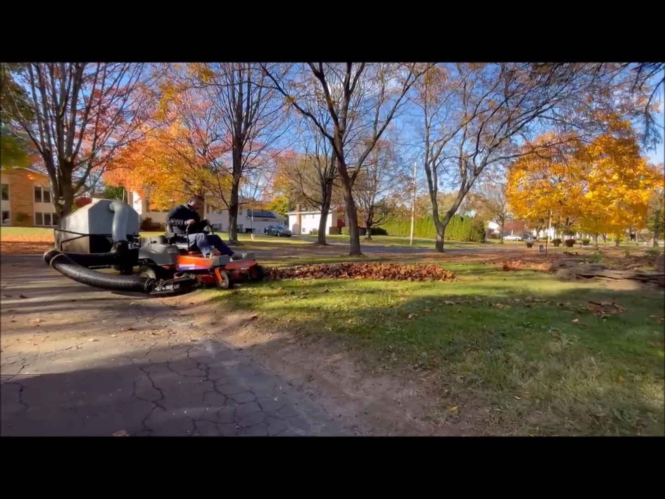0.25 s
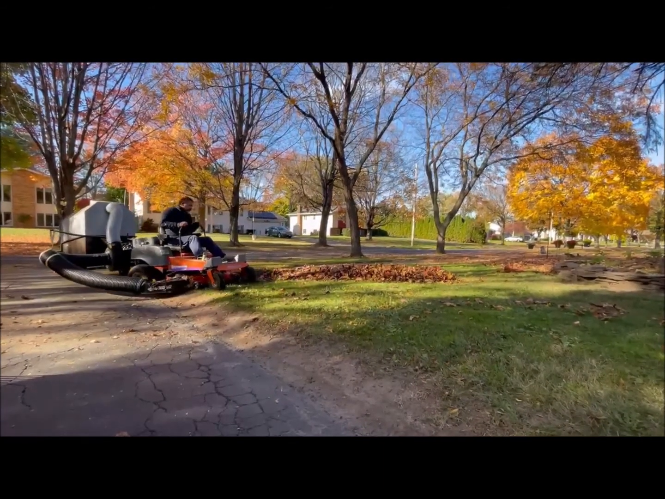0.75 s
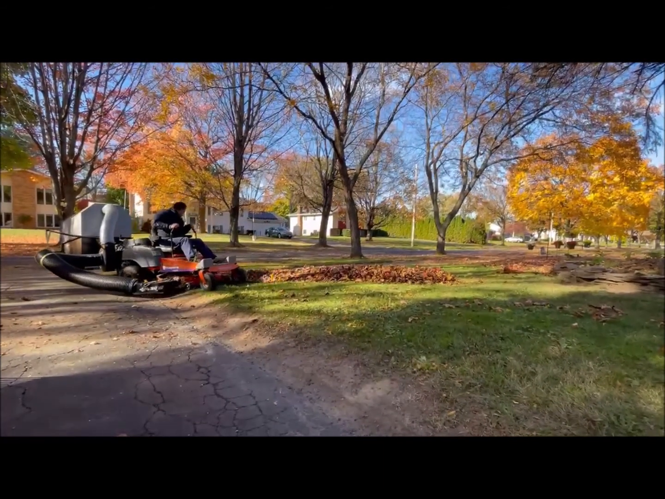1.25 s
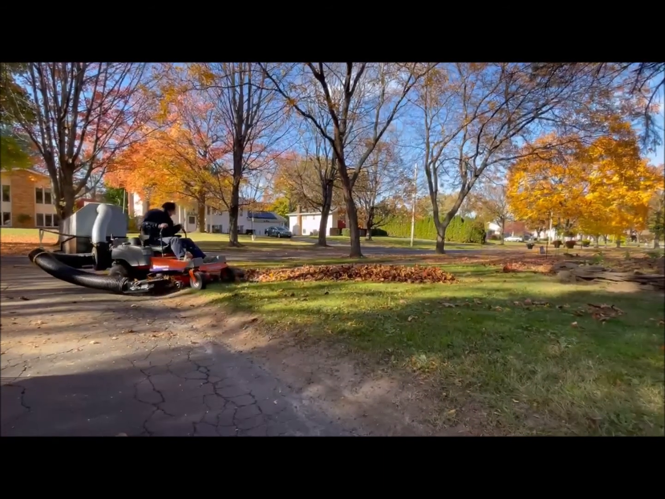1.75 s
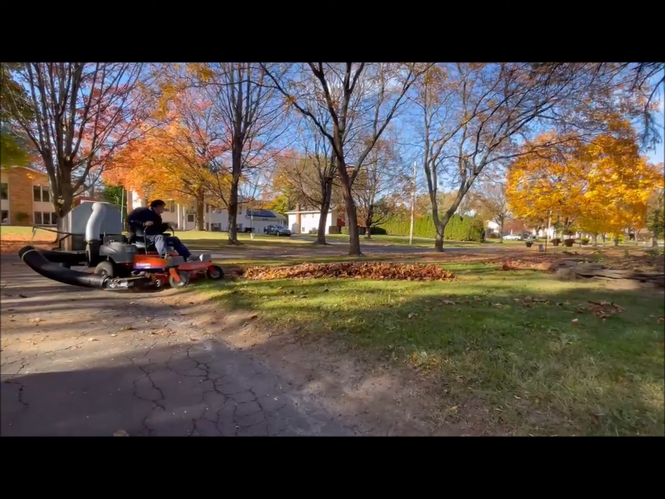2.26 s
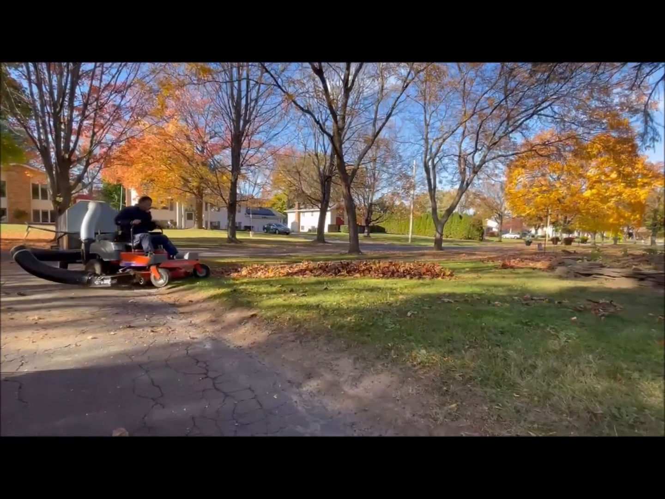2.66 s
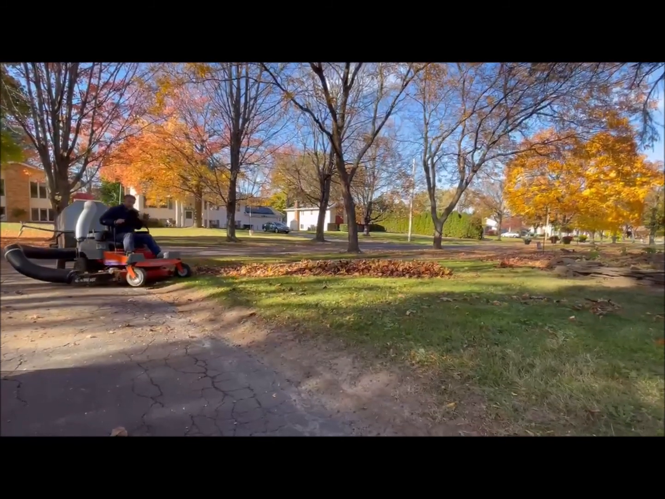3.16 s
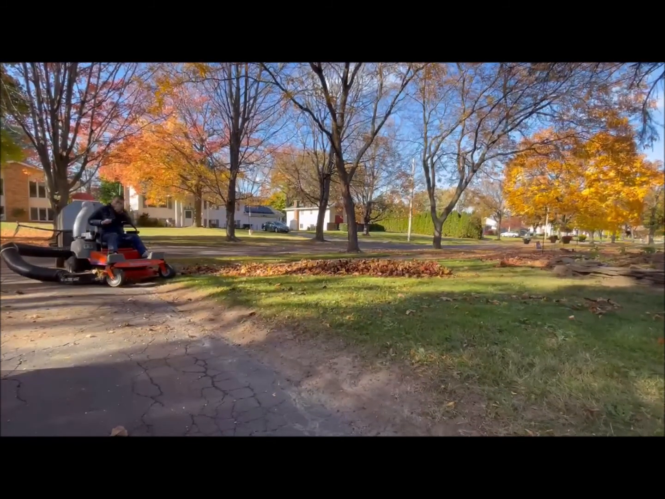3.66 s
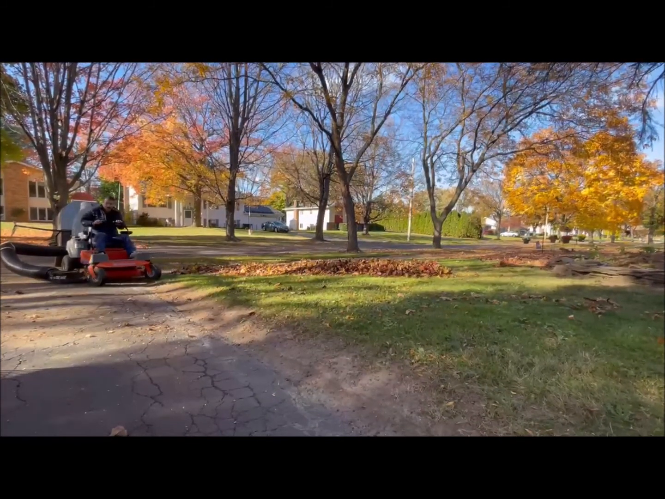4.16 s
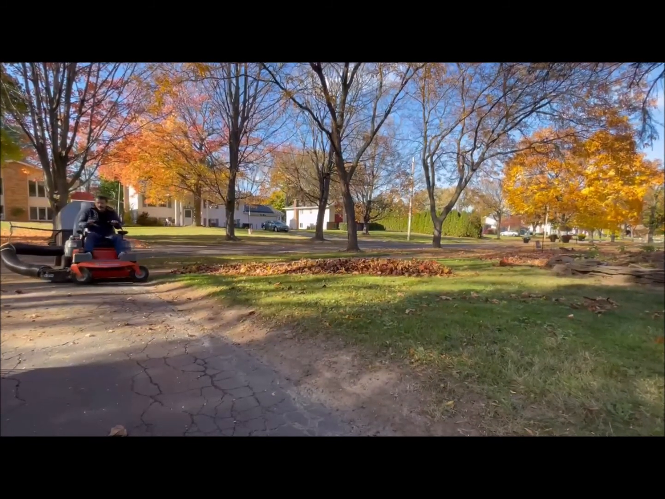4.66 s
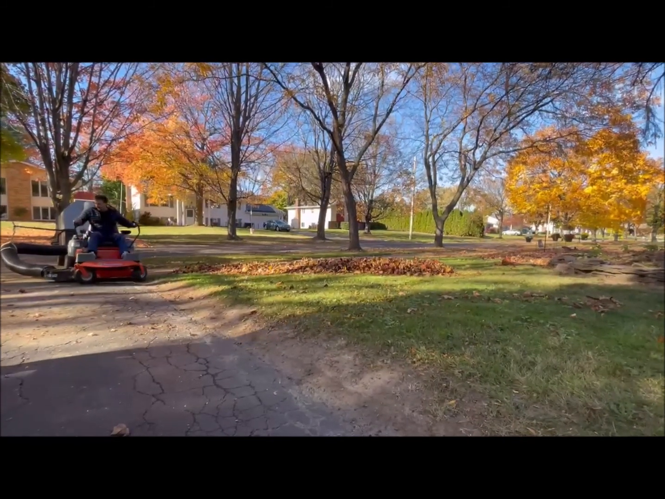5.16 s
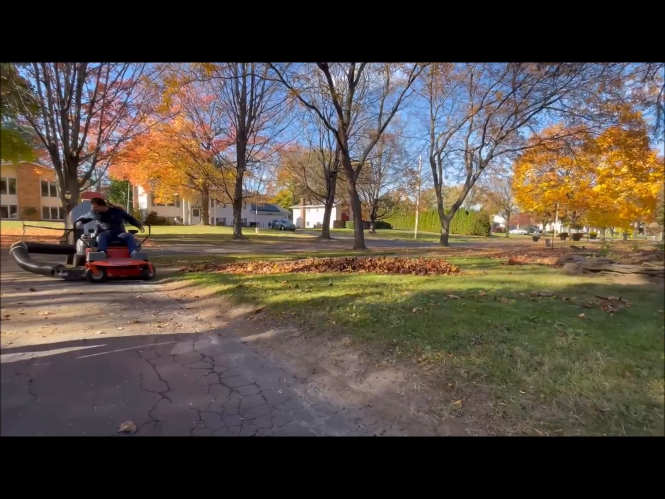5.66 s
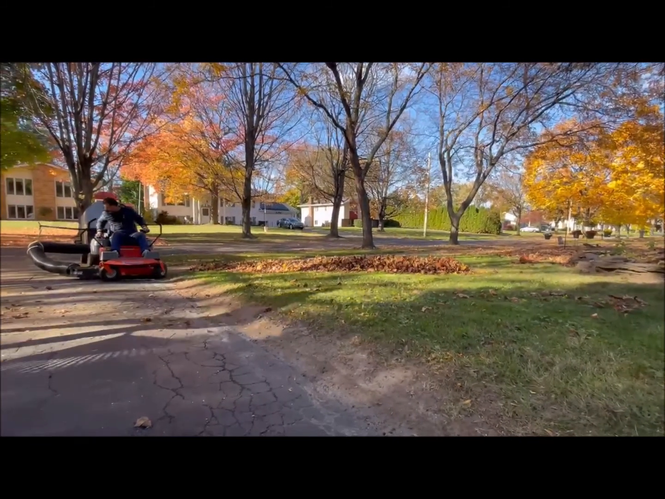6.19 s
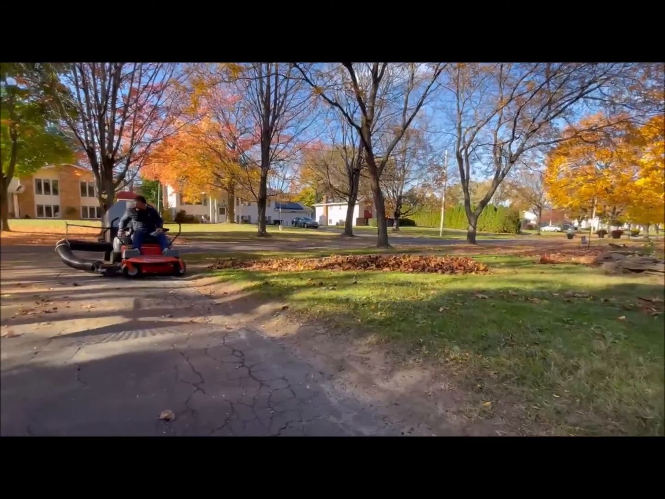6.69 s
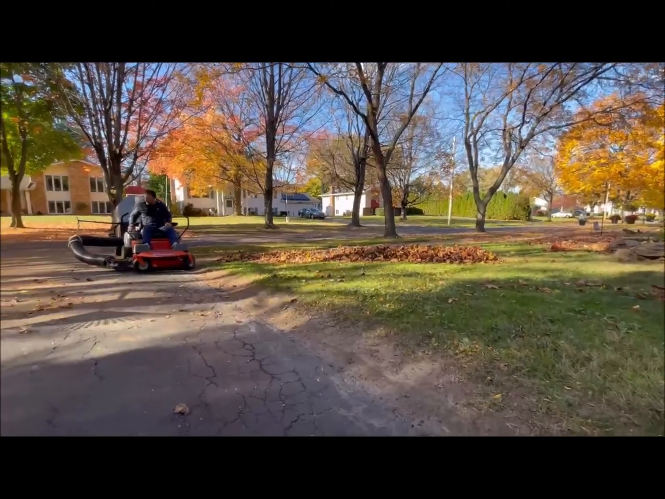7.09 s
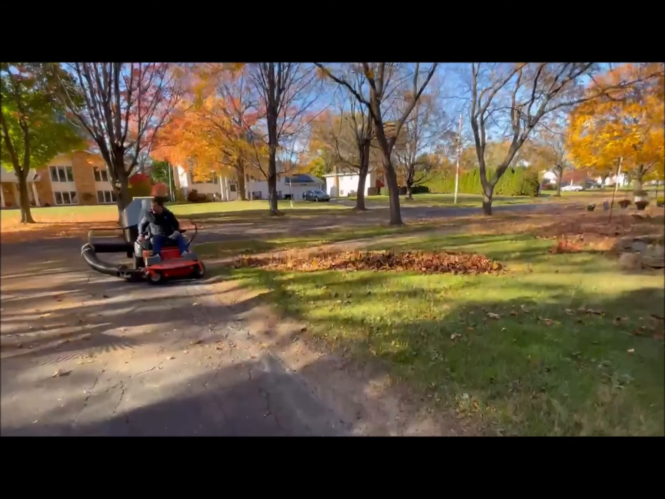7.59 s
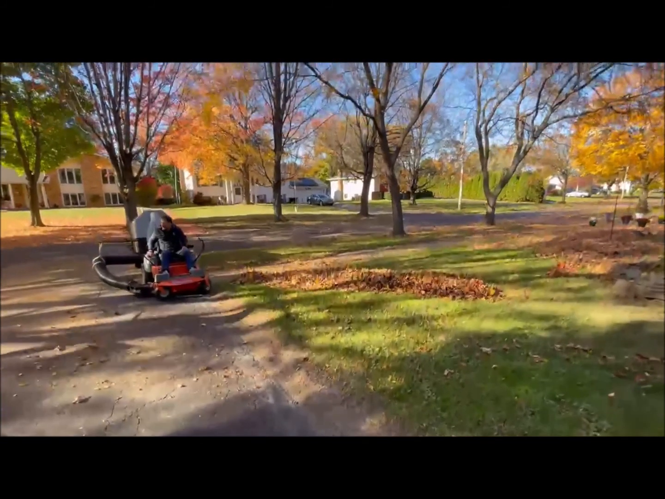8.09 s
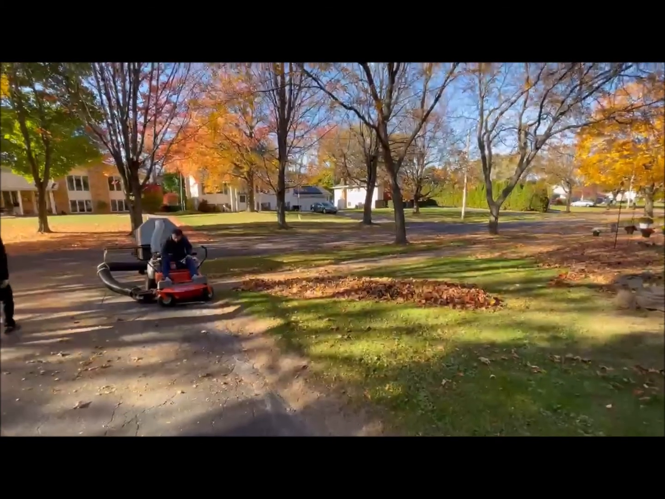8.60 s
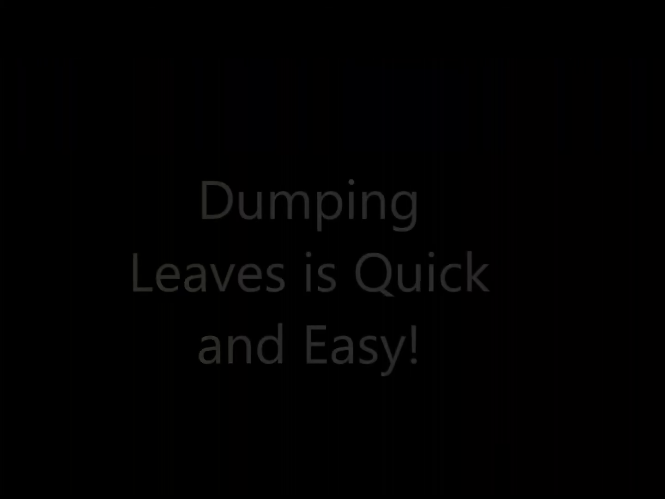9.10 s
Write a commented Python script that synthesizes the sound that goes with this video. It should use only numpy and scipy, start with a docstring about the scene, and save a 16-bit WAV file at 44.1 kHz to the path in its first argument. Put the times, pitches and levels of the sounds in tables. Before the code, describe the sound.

A riding mower tows a leaf vacuum across a lawn, a few metres ahead and to the left. Two engines drone under the hum and roar of the blades, while the fan howls and dry leaves and twigs rattle up the hose. Later the blades spin down with a rising swish, the mower throttles back, and leaves crunch close to the microphone. The sound cuts off suddenly.

```python
"""A riding mower tows a leaf vacuum with its own engine across a lawn, a few metres from a two-port
microphone. The two four-stroke engines beat against the hum and roar of the blades, while the vacuum's
fan howls and dry leaves and twigs rattle up the hose. The blades are switched off and spin down, the
mower throttles back and turns head-on, leaves crunch close by; then the sound is cut."""
import sys
import numpy as np
from scipy import signal
from scipy.fft import rfft, irfft
from scipy.io import wavfile

SR = 44100
rng = np.random.default_rng(int(sys.argv[2]) if len(sys.argv) > 2 else 0)


def dump_mix(stems):
    """Bounce the given channels to the path in sys.argv[1] as a 16-bit WAV at rate SR."""
    frames = np.atleast_2d(stems).T  # one column per channel
    limited = np.clip(frames, -1, 1)  # hard clip at full scale
    pcm = np.round(limited * 32767).astype(np.int16)
    wavfile.write(sys.argv[1], SR, pcm)


N = 411894
TIME, BINS_HZ = np.arange(N) / SR, np.fft.rfftfreq(N, 1 / SR)

# mower crankshaft: (time [s], speed [rev/s], exhaust level [dB], unevenness [share of speed])
MOWER_CRANK = [(0, 52.6, 0, .0015), (1.5, 52.6, 0, .0015), (2.25, 52.3, 0, .0015), (3, 52.66, -1, .0015),
               (4.5, 52.6, -2.5, .0015), (6.2, 52.9, -2.5, .002), (6.45, 54.4, -2, .004),
               (7, 53.8, -5, .01), (7.4, 51, -7, .03), (7.8, 46, -9, .04), (8.15, 40.6, -12, .02),
               (8.8, 40.4, -11, .015)]
# vacuum crankshaft: (time [s], speed [rev/s])
VACUUM_CRANK = [(0, 58.2), (1.4, 58.27), (2.1, 58.1), (3.5, 58.45), (4.9, 58.6), (8.8, 58.6)]
# exhaust partials, half orders included: (order [x crank speed], level [dB])
MOWER_ORDERS = [(1, -46), (1.5, -45.5), (2, -45), (2.5, -35), (3, -40), (3.5, -63.5), (4, -43),
                (4.5, -40.5), (5, -44), (5.5, -51), (6, -45), (6.5, -42.5), (7, -43), (7.5, -47),
                (8, -47.5), (8.5, -48.5), (9, -47), (9.5, -50.5), (10, -53), (10.5, -56.5), (11, -54),
                (11.5, -49.5), (12, -43.5), (12.5, -49.5), (13, -51), (13.5, -51), (14, -48.5), (14.5, -54),
                (15, -54), (16, -43), (17, -51), (18, -50.5), (20, -49)]
VACUUM_ORDERS = [(1, -39.5), (1.5, -48), (2, -34), (2.5, -36), (3, -47), (3.5, -55), (4, -41.5), (4.5, -55),
                 (5.5, -45.5), (6, -59), (7, -50), (7.5, -51), (8, -46.5), (10, -57.5), (11, -55)]
# machine turning: (time [s], clatter level [dB], facing [0 side-on, 1 head-on])
HEADING = [(0, -31.5, 0.01), (1, -29.5, 0), (2.8, -32.5, 0), (3.7, -33, 0.08), (5, -30.5, 0.12),
           (6.2, -32, 0.07), (6.5, -31, 0.2), (7, -31, 0.2), (7.5, -27.5, 0.83), (8.1, -30.5, 0.75),
           (8.8, -30.5, 0.93)]
# clatter spectrum: (frequency [Hz], side-on [dB], head-on [dB])
CLATTER_SPECTRA = [(20, -20.5, -21.5), (42, -19, -21), (70, -5, -3.5), (130, 3, 3.5), (177, -5.5, 0.5),
                   (225.3, 3, 3), (284.5, -4.5, -7.5), (354, -6.5, -6), (463, -1.5, -17), (597, -9, -12),
                   (1070, -8.5, -22), (1395, -8, -21.5), (1990, -16.5, -28.5), (4000, -29, -36.5),
                   (9030, -39, -45), (14000, -74, -72.5)]

def engines():
    """Two four-stroke engines: exhaust tones, and clatter and boom that pulse with the firing."""
    mower_rps, mower_db, uneven = play(MOWER_CRANK)
    vacuum_turns = spin(play(VACUUM_CRANK)[0], wobble=.0025, wobble_hz=14)
    mower_turns = spin(mower_rps, uneven, wobble_hz=14)
    shade_db = -9 * np.sqrt(facing())
    tones = exhaust(vacuum_turns, VACUUM_ORDERS, .3, .77 * shade_db, rough=.25)
    tones += exhaust(mower_turns, MOWER_ORDERS, mower_db, shade_db, rough=.2)
    knocks = noise() * puffs(vacuum_turns / 2, length=.22, depth=.8)
    knocks *= puffs(mower_turns / 2, length=.15, depth=.41)
    clatter = gain_of(play(HEADING)[0] - .66) * turning(knocks, CLATTER_SPECTRA)
    return tones, clatter + boom(mower_turns)


def exhaust(turns, orders, level_db, shade_db, rough):
    """Firing tones; the higher ones are rougher and are shadowed by the machine's body."""
    total = 0
    for order, db in orders:
        high = min(order / 8, 1)
        total += tone(order * turns, db + level_db + high * shade_db, 2.8 * high, rough * high)
    return total


# exhaust boom: (time [s], pitch [Hz], level [dB])
BOOM = [(0, 662, -43), (3, 650, -44), (4.2, 654, -49), (5.8, 649.7, -46), (6.2, 695, -38.5),
        (6.8, 677, -47.5), (7.6, 684, -43), (8.1, 786, -41), (8.5, 828, -38.5), (8.8, 828, -42)]
# its resonances: (frequency [x pitch], width [Hz], level [dB])
BOOM_MODES = [(.9, 140.4, -2.5), (1.02, 120, 1), (1.62, 140, -8.5)]

def boom(turns):
    """A puff of gas every second turn rings the mower's exhaust."""
    pitch_hz, level_db = play(BOOM)
    gas = noise() * puffs(turns / 2, length=.3, depth=1.9)
    ring = sum(gain_of(db) * resonate(gas, ratio * pitch_hz, width) for ratio, width, db in BOOM_MODES)
    return gain_of(level_db) * ring


# blade tips passing the deck wall while driven: (time [s], rate [Hz])
BLADE_RATE = [(0, 109.4), (1.1, 109.1), (1.6, 108.4), (3, 109.6), (5, 109.4), (5.5, 110.1)]
# full-speed hum, varying with deck angle: (time [s], fundamental [dB], octave [dB], overtone gain [dB])
BLADE_HUM = [(0, -29.5, -27, 1), (.7, -32, -28, -1.5), (1.2, -43, -40.5, -1.5), (1.7, -41, -29.5, -1.5),
             (2.7, -34.5, -29.5, 2), (3.2, -28, -33.5, 0), (4.2, -28, -39.5, -0.5),
             (5.2, -25.5, -35.5, 0.5), (5.8, -29.5, -34, 3), (6.25, -29.5, -35.5, -1)]
# overtones: (order [x blade rate], level [dB])
BLADE_ORDERS = [(3, -42.5), (4, -42.5), (5, -44), (6, -43.5), (7, -54.5), (8, -48), (9, -49), (10, -52),
                (11, -53)]
# air noise: (time [s], deck roar [dB], fan howl [dB], hose hiss [dB])
AIR_LEVELS = [(0, -37, -40, -46), (2.2, -36, -35.5, -47), (3.2, -35, -37.5, -45), (4.2, -37.5, -35, -45.5),
              (5.5, -38, -41, -45.5), (6.15, -39.5, -45, -44.5), (6.5, -41, -40.5, -47),
              (7.1, -53, -44, -55), (7.5, -53.5, -60, -55.5), (8.75, -51.5, -68.5, -53.5)]
# deck roar: (frequency [Hz], level [dB])
ROAR_SPECTRUM = [(150, -15.5), (400, -10.5), (690, -0.5), (790, -13), (900, -3.5), (1050, 1.5),
                 (1240, -4.5), (1400, -0.5), (1700, -5), (2000, -7), (2900, -10.5), (3600, -15),
                 (4600, -23.5), (9000, -39), (14000, -76.5)]
# steel deck: (frequency [Hz], width [Hz], level [dB])
DECK_MODES = [(879, 95, -5), (1303, 290, -17.5), (1720, 140, -25.5), (2186, 310, -16.5), (2816, 360, -18)]
BLADES_OFF_S, COAST_TAU_S, HUM_DB_PER_SPEED_DECADE = 6.24, 2.58, 68

def blades():
    """The blades hum and chop the air, then coast down; the roar rings in the steel deck."""
    speed = np.exp(-np.maximum(TIME - BLADES_OFF_S, 0) / COAST_TAU_S)
    turns = spin(speed * play(BLADE_RATE)[0], wobble=.0012, wobble_hz=10)
    fundamental_db, octave_db, overtones_db = play(BLADE_HUM)
    hum = tone(turns, fundamental_db, waver_db=1) + tone(2 * turns, octave_db, waver_db=.1)
    shade_db = -3.5 * facing()  # per order: the deck shades the high overtones
    for order, db in BLADE_ORDERS:
        hum += tone(order * turns, db + overtones_db + order * shade_db, waver_db=.3, rough=.081)
    hum *= gain_of(HUM_DB_PER_SPEED_DECADE * np.log10(speed))
    air = noise() * puffs(turns, length=.43, depth=.55) * gain_of(.5 * drift(8.6))
    roar = gain_of(5.5) * colour(air, ROAR_SPECTRUM) + ringing(air, DECK_MODES)
    return hum, gain_of(play(AIR_LEVELS)[0]) * roar


# chute, loudest as it swings past: (time [s], rasp [dB], drone [dB])
CHUTE_LEVELS = [(0, -58, -62), (2.2, -49.5, -56.5), (2.85, -41, -56), (3.4, -48.5, -60), (4, -47, -59),
                (5.2, -48, -54), (5.75, -46, -45), (6, -45.5, -37.5), (6.2, -41, -40), (6.35, -54, -54),
                (7.1, -59, -56), (7.5, -64.5, -61)]
# rasp resonances: (frequency [Hz], width [Hz], level [dB])
RASP_MODES = [(2246, 190, -2), (2520, 240, -2), (2796, 140, 1)]

def chute():
    """Air chopped by the blades rasps and drones in the discharge chute."""
    rasp_db, drone_db = play(CHUTE_LEVELS)
    passes = np.cumsum(play(BLADE_RATE)[0]) / SR
    air = noise() * puffs(passes, length=.3, depth=2.2)
    rasp = gain_of(rasp_db) * unit_rms(ringing(air, RASP_MODES))
    return rasp + gain_of(drone_db) * resonate(air, hz=1920, width_hz=244)


# fan housing: (frequency [Hz], width [Hz], level [dB])
FAN_MODES = [(1117.6, 79, 0.5), (1043.5, 91, -5), (1754, 140, -11.5)]
# impeller whine: (time [s], level [dB])
WHINE_LEVEL = [(0, -59), (3, -55), (4, -49), (4.7, -46.5), (5.3, -38.5), (5.9, -44.5), (6.2, -56), (7, -50),
               (7.5, -63)]
# air in the hose: (frequency [Hz], side-on [dB], head-on [dB])
HISS_SPECTRA = [(1500, -16, -13), (2880, -8, -1), (3300, 3.5, -2), (3650, 0, 0), (4400, -4, -23),
                (4800, -3.5, -12), (5070, 1.5, -4), (6340, -5, -4), (6960, -6, -1.5), (8150, -7.5, -14),
                (9420, 1, -3.5), (11400, -33, -24), (13960, -51, -50.5)]
WHINE_ORDER = 18.9

def fan():
    """The vacuum's impeller howls and whines in its housing, and air hisses through the hose."""
    _, howl_db, hiss_db = play(AIR_LEVELS)
    howl = gain_of(howl_db + 1.2 * drift(12)) * ringing(noise(), FAN_MODES, wander=.007)
    turns = spin(play(VACUUM_CRANK)[0], wobble=.009, wobble_hz=30)
    whine_db = play(WHINE_LEVEL)[0] - 1
    whine = np.array([tone(WHINE_ORDER * turns, whine_db, waver_db=1, rough=.4) for _ in range(2)])
    return howl + whine + gain_of(hiss_db + 1.5) * turning(noise(), HISS_SPECTRA)


# leaf flow, thinning as the machine leaves the pile: (time [s], level [dB])
LEAF_FLOW = [(0, -39.5), (1.9, -39), (2.6, -41.5), (2.95, -45.5), (4.1, -47.5), (4.7, -49), (6.5, -53.5),
             (6.95, -54.5), (8.75, -53)]
# clumps sucked in at once: (time [s], boost [dB])
CLUMPS = [(.3, 1), (.62, 1.5), (1.02, 1.5), (1.72, 4.5), (3.97, 6)]
# leaves in the hose: (frequency [Hz], level [dB])
HOSE_LEAF_SPECTRUM = [(2500, -15), (6000, -2), (7800, -6.5), (8500, -2), (9700, 2.5), (10800, -1.5),
                      (11800, -12), (12600, -21), (13500, -43), (15500, -34)]
CLUMP_HALF_LENGTH_S = .03

def hose_leaves():
    """Shredded leaves rustle up the hose in clumps; the larger pieces crackle."""
    flow = noise() + .3 * crackle(per_s=900, spread_db=6.3)
    flow *= gain_of(1.6 * drift(17))
    clumps_db = sum(db * np.exp(-((TIME - s) / CLUMP_HALF_LENGTH_S) ** 2) for s, db in CLUMPS)
    return gain_of(play(LEAF_FLOW)[0] + clumps_db) * colour(flow, HOSE_LEAF_SPECTRUM)


# twig strikes: (time [s], level [dB], frequency [Hz], t60 [s])
TWIGS = [(.6206, -22, 8940, 0.02), (2.5091, -18.5, 9960, .018), (2.757, -32, 6200, .07),
         (3.5489, -29, 9700, 0.047), (3.6924, -25.5, 9600, 0.07), (5.612, -28, 8200, .07),
         (5.7539, -39, 7500, .03), (8.347, -25, 1600, .02), (8.346, -26, 900, .05)]

def twigs():
    """Each twig striking the fan or hose gives a short rattle."""
    t, out = np.arange(SR // 4) / SR, np.zeros((2, N))
    for s, db, hz, t60 in TWIGS:
        band = signal.butter(3, [hz / 1.2, hz * 1.1], "bandpass", fs=SR)
        burst = unit_rms(signal.lfilter(*band, rng.standard_normal((2, len(t)))))
        start = round(s * SR)
        out[:, start:start + len(t)] += burst * gain_of(db - 7 - 60 * t / t60)
    return out


# swish as the machine swings round: (time [s], pitch [Hz], level [dB], comb depth [dB])
SWISH = [(5.75, 2000, -56, 0), (6.02, 2700, -49, 0), (6.17, 3750, -41, 0), (6.28, 4350, -46, 2),
         (6.43, 5550, -49.5, 1.5), (6.9, 5550, -52, 1), (7.4, 5650, -56, 0.5), (8, 6400, -64.5, 1),
         (8.8, 6600, -61.5, 0.2)]
# its bands: (frequency [x pitch], width [Hz], level [dB])
SWISH_BANDS = [(.34, 800, 2.5), (.73, 700, -5.5), (1, 1098, -1)]
# its top band: (time [s], frequency [Hz], level [dB])
SWISH_TOP = [(6.1, 4500, -62), (6.19, 5110, -46), (6.24, 6050, -46), (6.29, 7000, -51), (6.35, 8200, -56.5),
             (6.42, 9300, -74.5)]

def swish():
    """Bands of hiss, as from a shortening reflection, glide upward; the top one is brief and steep."""
    pitch_hz, level_db, _ = play(SWISH)
    top_hz, top_db = play(SWISH_TOP)
    body = sum(gain_of(db) * resonate(noise(), ratio * pitch_hz, width)
               for ratio, width, db in SWISH_BANDS)
    top = resonate(noise(), top_hz, width_hz=1000)
    return gain_of(level_db - 3.5) * body + gain_of(top_db - 2) * top


# brief thin tones: (peak time [s], half length [s], frequency [Hz], level [dB])
THIN_TONES = [(1.72, .2, 3400, -48), (1.822, .025, 8380, -41), (3.14, .045, 4430, -46),
              (4.175, .025, 980, -38), (4.53, .035, 990, -39), (4.52, .035, 7170, -48),
              (6.97, .022, 6320, -49), (7.085, .025, 6560, -52), (8.105, .02, 6990, -52),
              (8.68, .03, 6600, -51)]
THIN_TONE_WIDTH_HZ = 110

def thin_tones():
    """Brief thin tones swell and fade: high chirps and whistles, and two flares of the fan's whine."""
    out = np.zeros((2, N))
    pole = np.exp(-np.pi * THIN_TONE_WIDTH_HZ / SR)
    for s, half_s, hz, db in THIN_TONES:
        t = np.arange(-3 * half_s, 3 * half_s, 1 / SR)
        wander = unit_rms(signal.lfilter([1], [1, -pole], rng.standard_normal((2, len(t)))))
        cycles = np.cumsum(hz + THIN_TONE_WIDTH_HZ / 2 * wander, axis=1) / SR
        swell = gain_of(db - 1.5) * np.exp(-(t / half_s) ** 2)
        start = round((s + t[0]) * SR)
        out[:, start:start + len(t)] += swell * np.sqrt(2) * np.sin(2 * np.pi * cycles)
    return out


# leaves on the ground: (frequency [Hz], level [dB])
GROUND_LEAF_SPECTRUM = [(1500, -20.5), (3000, 0), (4400, 2.5), (6200, -4), (7000, -5.5), (8000, -10.5),
                        (10000, -16), (14000, -40.5)]
# steady rustle: (time [s], level [dB])
RUSTLE_LEVEL = [(6.4, -75), (6.75, -55), (7.3, -53), (7.5, -56), (8.05, -59), (8.11, -52.5), (8.8, -53.5)]
# scuffs: (peak time [s], level [dB], rise [s], decay [s], low-pass [Hz])
SCUFFS = [(6.2, -40.5, .05, .045, 4000), (6.7, -43.5, .018, .05, 7500), (7.235, -49, .025, .06, 6200)]

def ground_leaves():
    """Dry leaves crunch and rustle on the ground close to the microphone, a little to the right."""
    grains = crackle(per_s=2500, spread_db=5)
    crunch = colour(noise() + .6 * grains, GROUND_LEAF_SPECTRUM)
    out = gain_of(play(RUSTLE_LEVEL)[0]) * crunch
    for s, db, rise_s, decay_s, cutoff_hz in SCUFFS:
        dulled = signal.lfilter(*signal.butter(3, cutoff_hz, fs=SR), crunch)
        envelope = np.exp(-np.maximum((s - TIME) / rise_s, (TIME - s) / decay_s))
        out += gain_of(db) * envelope * dulled
    return out * gain_of([[-3], [0]])


# narrow bands that fade: (time [s], half length [s], frequency [Hz], half width [Hz], gain [dB])
BAND_DIPS = [(1, 1.2, 2540, 90, -2), (4, 0.55, 418, 40, -6.5), (5, 1.3, 3320, 170, -4.5),
             (5.2, 1.1, 850, 89.8, -4), (5.4, 0.63, 314, 25.1, -9), (5.1, 1.1, 660, 40, -4.5),
             (6.4, 0.59, 1020, 55, -4), (6.5, 0.092, 4250, 400, -4), (7, .4, 4260, 400, -6),
             (8.198, .9, 4450, 451, -6), (6.55, 0.16, 8000, 500, -2.5), (8.4, 0.59, 465, 55, -7.5),
             (8.551, .45, 1050, 110, -6)]
# evenly spaced hose resonances, clearest as its mouth swings into view: (time [s], depth [dB])
HOSE_RIPPLE = [(0, -0.3), (2.8, 0.9), (4.4, 1.5), (5.8, 1), (7, -0.5), (7.7, -1)]
HOSE_SPACING_HZ = 886

def shifting_colour(x):
    """Narrow bands fade and return; a reflection sweeps a comb through the treble; the hose ripples it."""
    frames = dict(fs=SR, nperseg=2048, noverlap=1536)
    hz, t, spectra = signal.stft(x, **frames)
    hz = hz[:, None]
    dips_db = sum(db * np.exp(-((t - s) / half_s) ** 2 - ((hz - centre_hz) / half_hz) ** 2)
                  for s, half_s, centre_hz, half_hz, db in BAND_DIPS)
    swish_hz, _, depth_db = (np.interp(t, TIME, column) for column in play(SWISH))
    comb_db = -depth_db * np.cos(3 * np.pi * hz / swish_hz) * np.clip(hz / 1000 - 1, 0, 1)
    ripple = np.cos(2 * np.pi * hz / HOSE_SPACING_HZ)
    ripple *= np.interp(hz, [2800, 3800, 8000, 9500], [0, 1, 1, 0])
    ripple_db = np.interp(t, TIME, play(HOSE_RIPPLE)[0]) * ripple
    return signal.istft(spectra * gain_of(dips_db + comb_db + ripple_db), **frames)[1][:, :N]


# microphone ports: (frequency [Hz], coherence [0-1], left lead [rad], left minus right [dB])
MIC_PORTS = [(60, 0.99, .17, -1.5), (168, 1, 0.62, 0.2), (253, 1, 0.95, -2), (465, 0.91, 2, 4),
             (733, 0.87, 1.76, 4.5), (920, 0.99, 3.3, 7), (1086, 0.32, 1.11, 5.5), (1340, 0.76, 4.25, -3.5),
             (1524, 0.55, 3.16, 5), (1720, 0.72, 3.4, 0), (1930, 0.87, 3.8, -2), (2820, 0.41, 6.93, -0.5),
             (3240, 0.49, 9.4, 0.5), (3420, 0.33, 10.76, 1.5), (3940, 0.26, 13, 6.5), (4450, .25, 14.2, 7),
             (5200, 0.22, 17, 14.5), (6660, 0.51, 20.1, 11), (7300, .45, 20.3, 10.5),
             (8000, 0.44, 21.2, 7.5), (8550, .45, 20, 2.5), (9170, 0.47, 19.4, 2), (9210, 1, 16.75, 0),
             (10870, 1, 15.01, 0), (11780, 0.9, 12.6, 0)]

def ports(pair):
    """Sound reaches the left port first; the housing shades the other; scatter loosens their likeness."""
    coherence, lead_rad, balance_db = across(MIC_PORTS)
    direct, scattered = rfft(pair)
    left = direct * gain_of(balance_db / 2)
    right = coherence * direct + np.sqrt(1 - coherence ** 2) * scattered
    right *= np.exp(-1j * lead_rad) * gain_of(-balance_db / 2)
    return irfft(np.array([left, right]), N)


def facing():
    """How far the machine points at the microphone, 0 to 1, at every sample."""
    return play(HEADING)[1]


def turning(x, spectra):
    """Colour that passes from side-on to head-on as the machine turns."""
    side_on, head_on = (colour(x, np.array(spectra)[:, [0, view]]) for view in (1, 2))
    return side_on + facing() * (head_on - side_on)


def spin(rate_hz, wobble, wobble_hz):
    """Turns made by a shaft whose speed is slightly uneven."""
    return np.cumsum(rate_hz * (1 + wobble * drift(wobble_hz))) / SR


def tone(turns, db, waver_db, rough=0):
    """One partial: it wavers slowly in the moving air; roughness adds a fast flutter."""
    size = gain_of(db + waver_db * drift(2.5)) * (1 + rough * drift(30))
    return np.sqrt(2) * size * np.sin(2 * np.pi * (turns + rng.random()))


def puffs(cycles, length, depth):
    """Envelope with one burst a cycle; length is its decay as a share of the cycle."""
    return unit_rms(1 + depth * np.exp(-(cycles % 1) / length))


def crackle(per_s, spread_db):
    """Sparse clicks of random size; rms one."""
    sizes = gain_of(spread_db * np.minimum(rng.exponential(1, N), 4))
    return unit_rms(noise() * sizes * (rng.random(N) < per_s / SR))


def ringing(air, modes, wander=0):
    """Turbulent air sounds the resonances of a housing, which may wander with the flow."""
    return sum(gain_of(db) * resonate(air, hz * (1 + wander * drift(11)), width)
               for hz, width, db in modes)


def resonate(x, hz, width_hz):
    """A steep resonance that may move; rms one."""
    carrier = np.exp(2j * np.pi * np.cumsum(hz * np.ones(N)) / SR)
    pole = np.exp(-np.pi * width_hz / SR)
    baseband = signal.lfilter([1], [1, -2 * pole, pole * pole], x / carrier)
    return unit_rms((carrier * baseband).real)


def colour(x, spectrum):
    """Gives x a spectrum and an rms of one."""
    return unit_rms(irfft(rfft(x) * gain_of(across(spectrum)[0]), N))


def noise():
    """Two unrelated white noises: the direct sound and its scattered part."""
    return rng.standard_normal((2, N))


def drift(corner_hz):
    """Slow random curve of unit size, with little above corner_hz."""
    count = 4096
    rolloff = 1 + (BINS_HZ[:count // 2 + 1] / corner_hz) ** 2
    slow = irfft(rfft(rng.standard_normal(count)) / rolloff)
    return np.interp(TIME, np.linspace(0, TIME[-1], count), unit_rms(slow))


def play(rows):
    """The columns of a time table at every sample."""
    s, *columns = np.transpose(rows)
    return [np.interp(TIME, s, column) for column in columns]


def across(rows):
    """The columns of a frequency table at every bin."""
    hz, *columns = np.transpose(rows)
    return [np.interp(np.log(BINS_HZ + 1), np.log(hz), column) for column in columns]


def gain_of(db):
    """Decibels to amplitude."""
    return 10 ** (np.asarray(db) / 20)


def unit_rms(x):
    """Scales to an rms of one."""
    return x / np.sqrt(np.mean(x ** 2) + 1e-20)


def scene():
    """The whole machine sounds from one place, ahead and to the left; the ground leaves are close by."""
    engine_tones, engine_noise = engines()
    hum, roar = blades()
    tones = engine_tones + hum
    scattered = np.roll(tones, SR // 30)  # thrown back by the trees
    noises = engine_noise + roar + fan() + chute() + hose_leaves() + swish()
    machine = shifting_colour(np.array([tones, scattered]) + noises) + twigs() + thin_tones()
    return ports(machine) + ground_leaves()


CUT_S, FADE_S, BAND_LIMIT_HZ = 8.772, .0076, 15600

def record(dry):
    """The sound is cut off within a few milliseconds and band-limited."""
    cut = dry * np.clip((CUT_S - TIME) / FADE_S, 0, 1)
    lowpass = signal.firwin(511, BAND_LIMIT_HZ, window=("kaiser", 9), fs=SR)
    return signal.oaconvolve(cut, lowpass[None], "same")


dry = scene()
out = record(dry)
dump_mix(out)
```